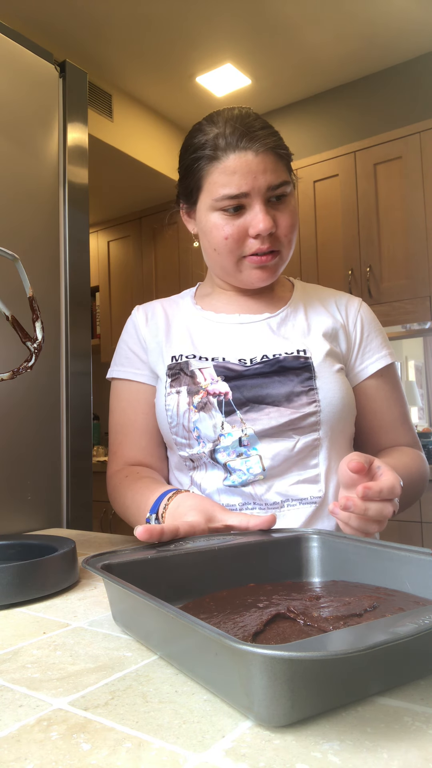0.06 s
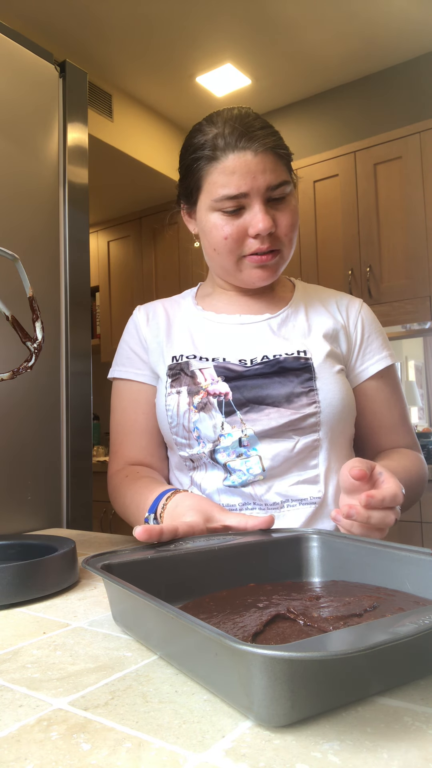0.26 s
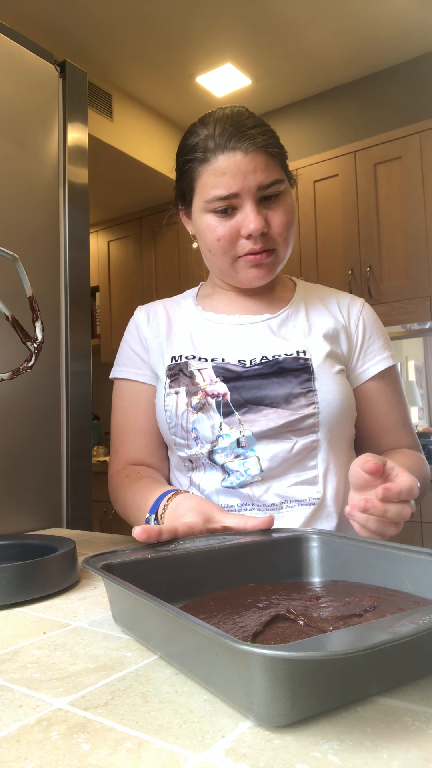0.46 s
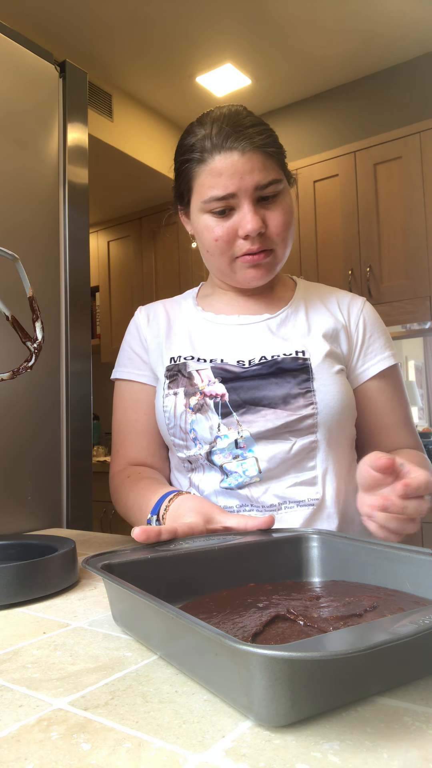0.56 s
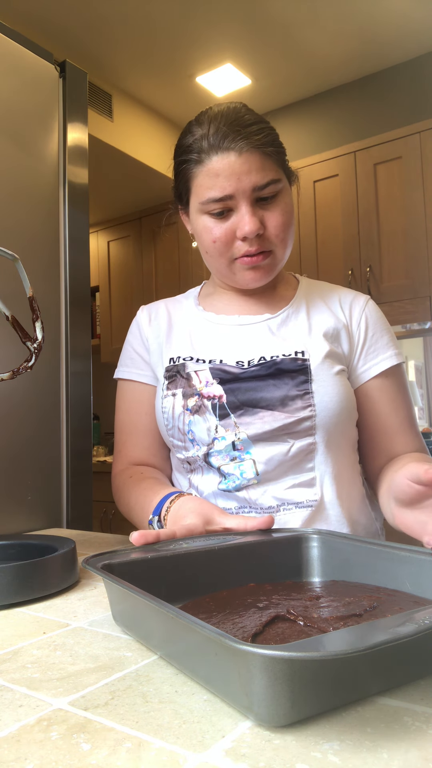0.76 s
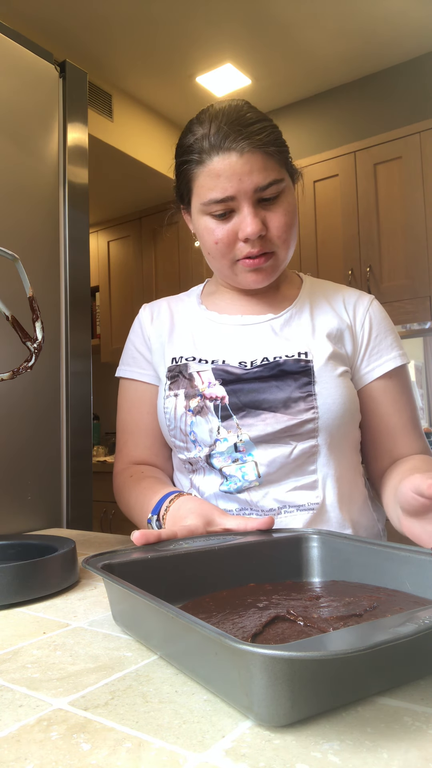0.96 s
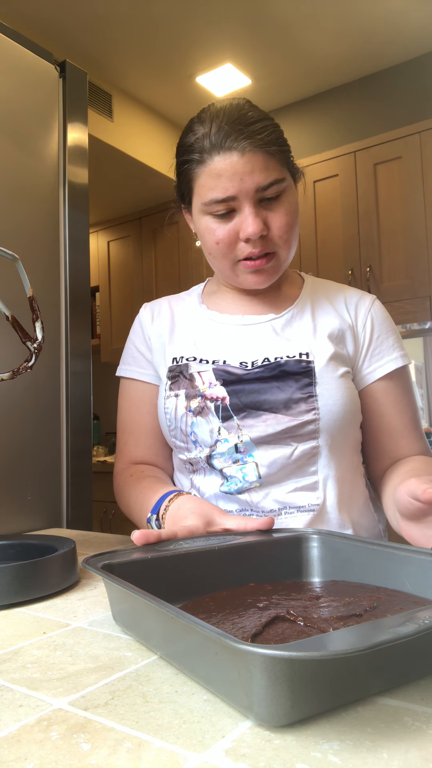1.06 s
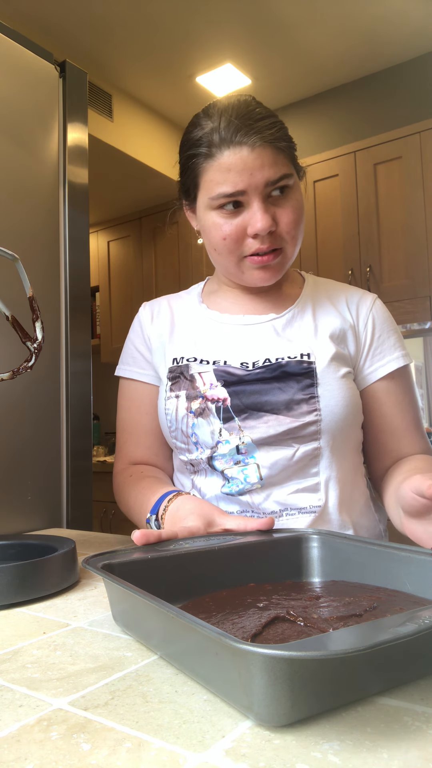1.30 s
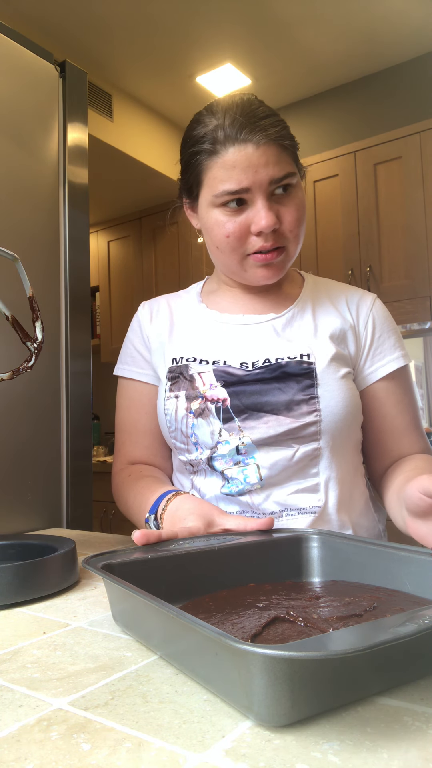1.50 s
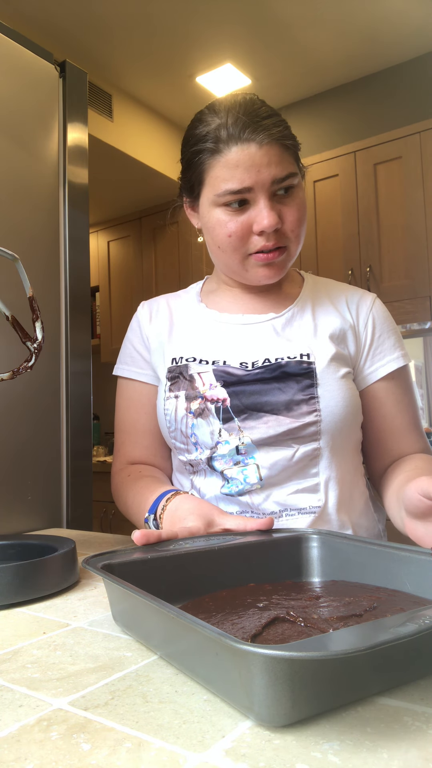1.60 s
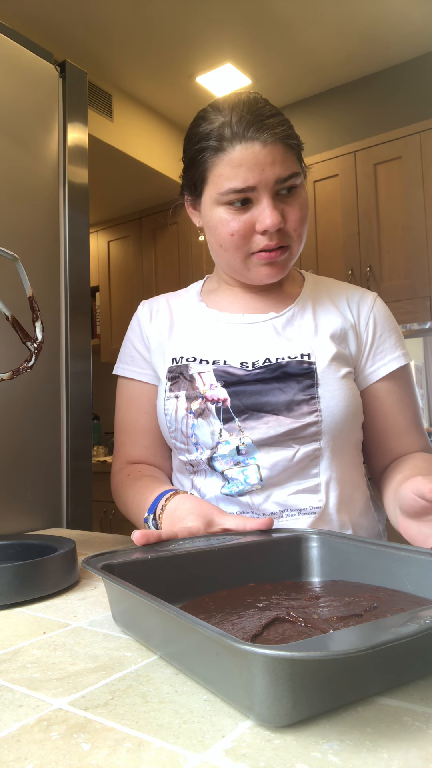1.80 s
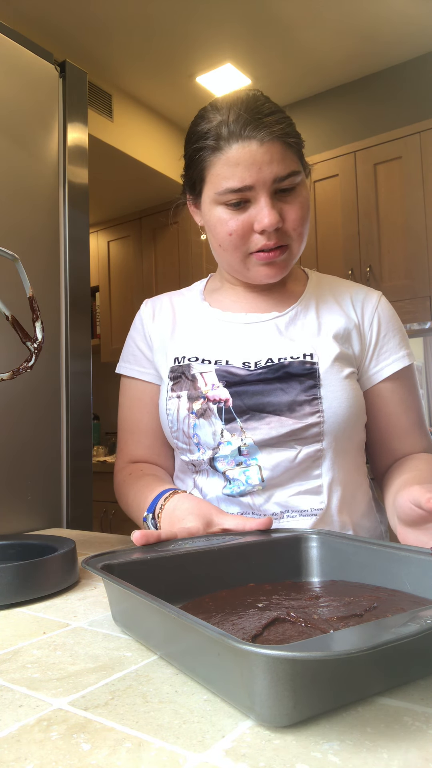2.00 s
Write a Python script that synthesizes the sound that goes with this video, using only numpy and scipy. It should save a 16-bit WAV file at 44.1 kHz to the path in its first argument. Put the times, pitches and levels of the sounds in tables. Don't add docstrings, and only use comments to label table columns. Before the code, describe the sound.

A metal baking pan heavy with batter knocks and rattles on a tiled kitchen counter

```python
import sys
import numpy as np
from scipy import signal
from scipy.fft import rfft, irfft
from scipy.io import wavfile
from scipy.ndimage import uniform_filter1d

SR = 44100
rng = np.random.default_rng(int(sys.argv[2]) if len(sys.argv) > 2 else 0)


def ratio_of_db(decibels):
    return 10 ** (np.asarray(decibels, float) / 20)


def store_wav(level_fs):
    pcm = np.round(np.clip(np.atleast_2d(level_fs), -1, 1) * 32767)
    wavfile.write(sys.argv[1], SR, pcm.T.astype(np.int16))


N = 90404
LEAD = 8820


def evened(x):
    return x / np.sqrt(np.mean(x ** 2) + 1e-20)


def read(points, hz):
    f, value = np.transpose(points)
    return np.interp(np.log(hz + 1), np.log(f + 1), value)


def add(mix, start_s, sound):
    part = mix[round(start_s * SR):][:len(sound)]
    part += sound[:len(part)]


def coloured(x, points):
    hz = np.fft.rfftfreq(len(x), 1 / SR)
    return irfft(rfft(x) * ratio_of_db(read(points, hz)), len(x))


def ring(modes, rise_s=1e-4):
    t = np.arange(SR) / SR
    x = 0
    for hz, db, t60_s in modes:
        x = x + ratio_of_db(db - 60 * t / max(t60_s, .01)) * np.sin(2 * np.pi * hz * t)
    return x * (1 - np.exp(-(t / rise_s) ** 2))


def knocks():
    # start_s, counter_db, floor_db, wall_db, crack_db
    contacts = [(-.08, -45, -29.5, -64, -23), (.004, -68, -32, -48, -50), (0.036, -48, -40, -63, -56),
                (0.071, -48, -47, -63, -53), (0.098, -44, -47, -47.5, -44),
                (.1100, -58, -27.5, -22.5, -22.5), (0.1119, -24, -6.5, -34, -22),
                (1.4316, -42, -31.5, -31.5, -44), (1.437, -18.5, -28.5, -50, -35),
                (1.4754, -66, -43, -54, -51), (1.5864, -20, -42, -9.5, -29), (1.676, -28.5, -35, -39, -45),
                (1.684, -33.5, -43, -23, -40), (1.692, -21, -48, -40, -48), (1.723, -42, -31.5, -42, -47),
                (1.827, -36.5, -69, -40.5, -50), (1.995, -48.5, -38.5, -40.5, -66.5),
                (2.013, -35, -34.5, -39, -52.5)]
    # pitch_hz; then level_db, t60_s
    counter_hz = [85, 94, 116, 135, 176, 200, 243, 123]
    counter_modes = [(-2.5, 0.17), (-3, 0.3), (-5.5, 0.19), (-53, 0.034), (-15, 0.4), (-12, 0.37),
                     (-1.5, 0.07), (-22.5, 1)]
    floor_hz = [245.7, 256.1, 233, 203.3, 290.2, 335.6, 378.3, 403.4, 461.2, 688, 822.6, 965, 1191]
    floor_modes = [(4.5, 0.12), (-3.5, 0.2), (-18, 0.66), (-27.5, 0.99), (-12, 0.13), (-10, 0.083),
                   (-13, 0.3), (-25.5, 0.72), (-16, 0.14), (-21.5, 0.13), (-16, 0.092), (-28, .07),
                   (-27, 0.1)]
    wall_hz = [419.7, 371.8, 410.4, 448.5, 289.8, 314.2, 341, 248.3, 529, 736, 668, 1090]
    wall_modes = [(9, 0.045), (-9.5, 0.37), (-11, 0.36), (-14.5, 0.37), (0, 0.1), (-10, 0.23), (-21.5, 1),
                  (-16, 0.21), (-20, 0.33), (-9, .05), (-24, 0.22), (-37, 0.38)]
    contact_s = 0.0053, 0.0027, 0.0035
    pitches = counter_hz, floor_hz, wall_hz
    decays = counter_modes, floor_modes, wall_modes
    bodies = [ring(np.column_stack(modes), rise_s) for *modes, rise_s in zip(pitches, decays, contact_s)]

    near_and_far = np.zeros((2, N + LEAD))
    noises = rng.standard_normal((len(contacts), 2, 6000))
    for (start_s, *body_db, crack_db), noise in zip(contacts, noises):
        flat_db = body_db[0] - max(body_db[1:])
        thump = sum(ratio_of_db(db) * body for db, body in zip(body_db, bodies))
        for mix, snap in zip(near_and_far, crack(noise, crack_db, flat_db)):
            add(mix, start_s + LEAD / SR, thump)
            add(mix, start_s + LEAD / SR, snap)
    return near_and_far


def crack(noise, db, flat_db):
    # pitch_hz, level_db
    crack_colour = [(300, 5.5), (900, 8), (1600, -2.5), (2900, -6.5), (4500, -8.5), (6300, -14),
                    (8500, -11.5), (16000, -21)]
    # pitch_hz, width_hz, boost_db
    crack_peaks = [(3090, 330, 10), (6390, 690, 17), (2070, 52, -0.5), (1070, 270, 6.5), (1667, 45, 9)]
    rise_s, t60_s, grit_db = 0.00079, 0.057, 3.5
    dull_hz, dull_per_db, dull_most_db = 8000, .9, 10
    room_db = -1

    size = noise.shape[1]
    t, hz = np.arange(size) / SR, np.fft.rfftfreq(size, 1 / SR)
    colour_db = read(crack_colour, hz)
    for peak_hz, width_hz, boost_db in crack_peaks:
        colour_db = colour_db + boost_db / (1 + ((hz - peak_hz) / width_hz) ** 2)
    colour_db -= dull_per_db * np.clip(flat_db, 0, dull_most_db) * np.log2(1 + (hz / dull_hz) ** 2)

    grit = ratio_of_db(grit_db * evened(uniform_filter1d(noise[1], size=30)))
    burst = evened(irfft(rfft(noise[0] * grit) * ratio_of_db(colour_db), size))
    burst = burst * (1 - np.exp(-t / rise_s)) * ratio_of_db(db - 60 * t / t60_s)
    click = np.roll(irfft(ratio_of_db(colour_db), size), 200)
    click = click * (1 - np.exp(-(t / rise_s) ** 2))
    return burst, ratio_of_db(room_db) * evened(click) * np.sqrt(np.mean(burst ** 2))


def rattle():
    # start_s, level_db, t60_s, brightness_db_per_octave
    shakes = [
        (-.05, -62.5, 1, -3.5),
        (0.11, -38.5, 0.15, 2.5),
        (1.44, -49.5, 0.36, 5.5),
        (1.586, -37.5, 0.47, 0),
        (1.684, -42.5, 0.23, 3.5),
        (1.831, -58, 0.45, 3.5),
        (1.999, -61, 0.33, -4),
    ]
    # pitch_hz, level_db, t60_s
    chatter_modes = [(614, -9, 0.022), (820, -7.5, 0.017), (1110, -3, 0.014), (1390, -3, 0.0069),
                     (2340, -4, 0.026), (2850, -3.5, 0.023), (3120, -9, 0.01), (3930, -12, 0.0094),
                     (5120, -14, 0.0083), (5980, -16.5, 0.01), (7340, -18.5, 0.006), (1066, -5, 0.026)]
    clicks_per_s, spread_db = 700, 1.5

    t = (np.arange(N + LEAD) - LEAD) / SR
    fades = [(t > s) * ratio_of_db(db - 60 * np.maximum(t - s, 0) / t60_s) for s, db, t60_s, _ in shakes]
    out = 0
    for mode in chatter_modes:
        octaves = np.log2(mode[0] / 2000)
        shake = sum(fade * ratio_of_db(row[3] * octaves) for fade, row in zip(fades, shakes))
        clicks = (rng.random(len(t)) < clicks_per_s / SR) * ratio_of_db(spread_db * rng.standard_normal(len(t)))
        out = out + signal.oaconvolve(clicks * shake, ring([mode])[:4000])[:len(t)]
    return out


def rim():
    # start_s, mode_set (0 tapped, 1 lifted, 2 landed, 3 rebound), level_db, swell_s, free_until_s
    strikes = [
        (.2, 1, -59, 0.038, 0.423),
        (1.437, 0, -35, 0.0027, 1.534),
        (1.462, 1, -41.5, 0.0032, 1.6),
        (1.587, 2, -34, 0.0073, 1.685),
        (1.687, 3, -45, 0.0049, 1.73),
    ]
    # pitch_hz; then level_db, t60_s
    tapped_hz = [998, 808, 2338, 2372, 2047, 3365, 4349, 4340, 4495, 5138, 5152, 6300, 7380]
    tapped_modes = [(-4, 0.14), (-2, 0.073), (0.5, 0.088), (-10.5, 0.94), (-13.5, 2.6), (-21.5, 0.31),
                    (-6.5, 0.14), (-11, 0.33), (-20, 0.47), (-15, 0.18), (-19, 0.65), (-11, 0.054),
                    (-19, 0.088)]
    lifted_hz = [1561, 1620, 2794, 2650, 2925]
    lifted_modes = [(0, 2.1), (-8, 0.42), (-3, 0.35), (-28, 0.23), (-19, 0.1)]
    landed_hz = [2047, 2372, 2650, 2794, 3795, 4349, 6067, 7230, 2925, 3170, 1850, 2230]
    landed_modes = [(-3, 0.35), (-1, 0.21), (-17, .3), (-1.5, 0.32), (-20, 0.04), (-0.5, 0.11),
                    (-12.5, 0.29), (-15, 0.095), (-4.5, 0.5), (-12, 0.27), (-12, 0.21), (-17, 0.12)]
    # pitch_hz, level_db, t60_s
    rebound_modes = [(5040, -8, .2), (5150, -7.5, 0.13), (2446, -4, 0.26), (2650, 1, 0.34),
                     (5830, -8, 0.09), (1570, -2.5, 0.28), (2007, -1.5, 0.37)]
    damp_s = 0.02
    wobble, wobble_s = .14, .008

    held = (tapped_hz, tapped_modes), (lifted_hz, lifted_modes), (landed_hz, landed_modes)
    bodies = [ring(np.column_stack(modes)) for modes in held] + [ring(rebound_modes)]
    out, t = np.zeros(N + LEAD), np.arange(SR) / SR
    for start_s, which, db, swell_s, until_s in strikes:
        damping = np.exp(-np.maximum(t + start_s - until_s, 0) / damp_s)
        shape = (1 - np.exp(-t / swell_s)) * damping
        add(out, start_s + LEAD / SR, ratio_of_db(db) * shape * bodies[round(which)])
    flutter = uniform_filter1d(rng.standard_normal(len(out)), size=round(wobble_s * SR))
    return out * (1 + wobble * evened(flutter))


def hand():
    # middle_s, half_length_s, level_db
    brushes = [(-0.003, 0.015, -57), (0.393, 0.054, -63), (0.515, 0.071, -64), (0.944, 0.041, -59.5),
               (1.04, 0.052, -65.5), (1.434, 0.057, -60.5), (1.62, 0.038, -51.5), (1.677, 0.012, -51),
               (1.823, .005, -58), (1.988, 0.065, -57.5)]
    # pitch_hz, level_db
    brush_colour = [(300, 7.5), (2000, -15), (6000, -9), (10000, -18), (14000, -16), (16000, -35)]
    # start_s, level_db, pitch_hz
    ticks = [(1.283, -60, 5000), (1.322, -68, 6500), (1.825, -60, 5200)]

    t, out = np.arange(N) / SR, np.zeros(N)
    stroke = sum(ratio_of_db(db) * np.exp(-((t - s) / half_s) ** 2) for s, half_s, db in brushes)
    for start_s, db, hz in ticks:
        ping = ring([(hz, 0, .02)], 2e-5)[:900]
        scratch = 0.94 * rng.standard_normal(900) * ratio_of_db(-60 * t[:900] / 0.017)
        add(out, start_s, ratio_of_db(db) * (ping + scratch))
    return out + stroke * evened(coloured(rng.standard_normal(N), brush_colour))


def kitchen(x):
    # pitch_hz, t60_s
    room_decay = [(80, 0.69), (250, 0.51), (700, 0.59), (1500, 0.59), (3000, 0.48), (6000, 0.46),
                  (12000, 0.3)]
    # pitch_hz, level_db
    room_share = [(80, -18.5), (300, -8.5), (600, -11.5), (1000, -11), (3000, -6.5), (8000, -7),
                  (15000, -5)]
    taps = np.zeros(SR)
    at = np.arange(200, SR - 20, 20)
    taps[at + rng.integers(0, 20, len(at))] = rng.choice([-1., 1.], len(at))
    hz, t, bands = signal.stft(taps, SR, nperseg=512)
    fade = ratio_of_db(-60 * t / read(room_decay, hz)[:, None])
    tail = signal.istft(bands * fade, SR, nperseg=512)[1][:SR]
    return signal.fftconvolve(coloured(x, room_share), tail / np.linalg.norm(tail))[:len(x)]


def background():
    # pitch_hz, width_hz, level_db
    hum_lines = [(96.4, 11, -56.5), (52, 2.9, -60), (200.6, 2.6, -69), (250.3, 4.7, -64),
                 (284.7, 4.1, -65.5), (363, 9, -70)]
    # pitch_hz, level_db
    hiss_colour = [(15, -20), (25, -25.5), (97, -3.5), (167, -9), (430, -10), (493, -13.5), (535, -16),
                   (6130, -32), (16300, -41)]
    hiss_db = -61
    whine_hz, whine_db = 500, -63.5

    hz = np.fft.rfftfreq(N, 1 / SR)
    hum = 0
    for line_hz, width_hz, db in hum_lines:
        spectrum = rfft(rng.standard_normal(N)) / (1 + ((hz - line_hz) / width_hz) ** 2)
        hum = hum + ratio_of_db(db) * evened(irfft(spectrum, N))
    hiss = ratio_of_db(hiss_db) * evened(coloured(rng.standard_normal(N), hiss_colour))
    whine = ratio_of_db(whine_db) * np.sin(2 * np.pi * whine_hz * np.arange(N) / SR)
    return hum + hiss + whine


def scene():
    (near, far), chatter, metal = knocks(), rattle(), rim()
    rim_room_db = -12
    pan = near + chatter + metal + kitchen(far + chatter + ratio_of_db(rim_room_db) * metal)
    return (pan[LEAD:] + hand() + background())[None]


def low_pass(x):
    return signal.sosfilt(signal.butter(12, 16410, fs=SR, output="sos"), x)


def record(dry):
    low_hz, edge_hz, limit = 76.7, 16000, .9
    x = signal.lfilter(*signal.butter(2, low_hz, "high", fs=SR), dry)
    lowpass = signal.firwin(511, edge_hz, window=("kaiser", 10), fs=SR)
    x = signal.oaconvolve(x, lowpass[None], "same")
    return low_pass(limit * np.tanh(x / limit))


dry = scene()
out = record(dry)
store_wav(out)
```